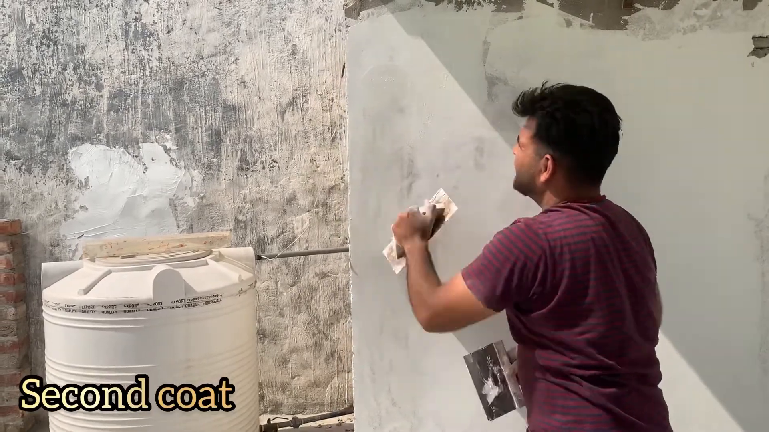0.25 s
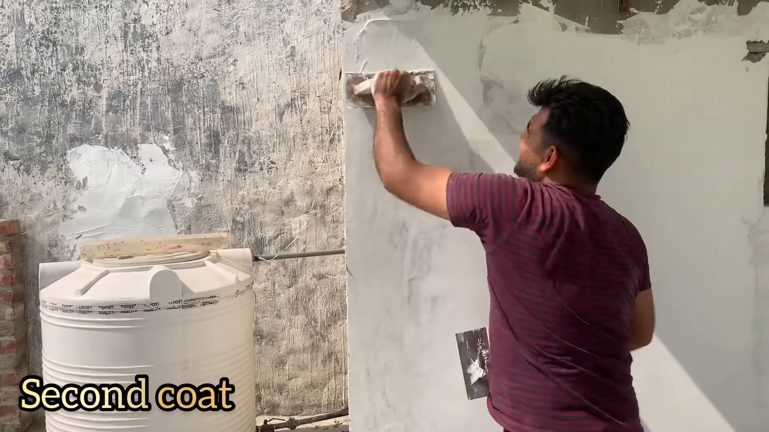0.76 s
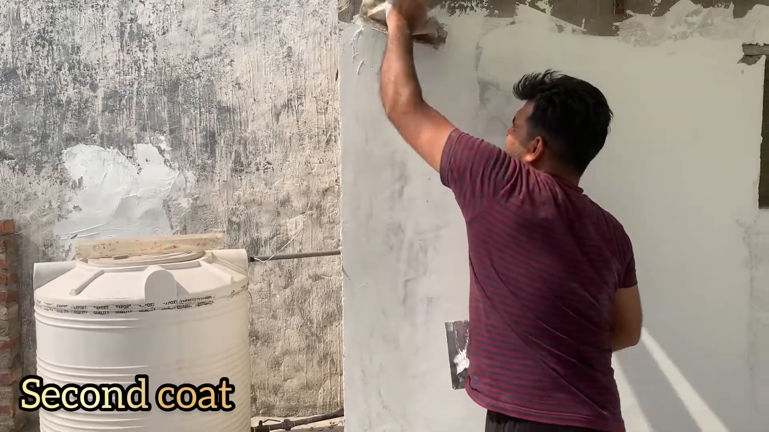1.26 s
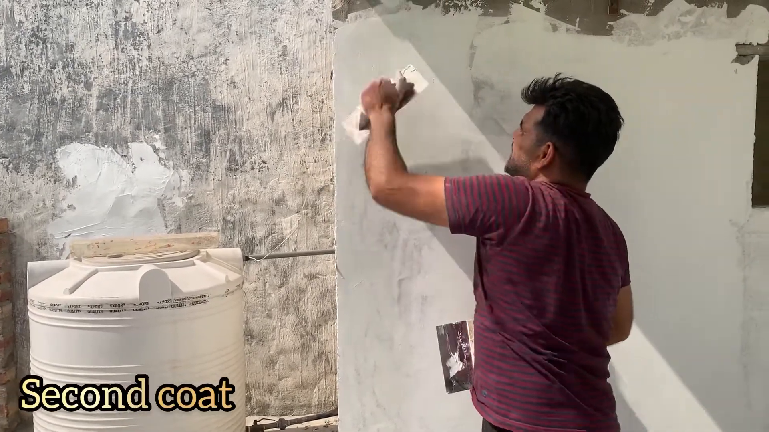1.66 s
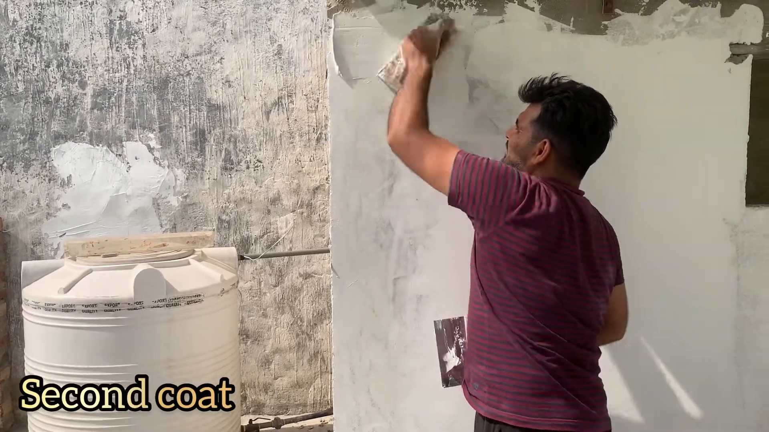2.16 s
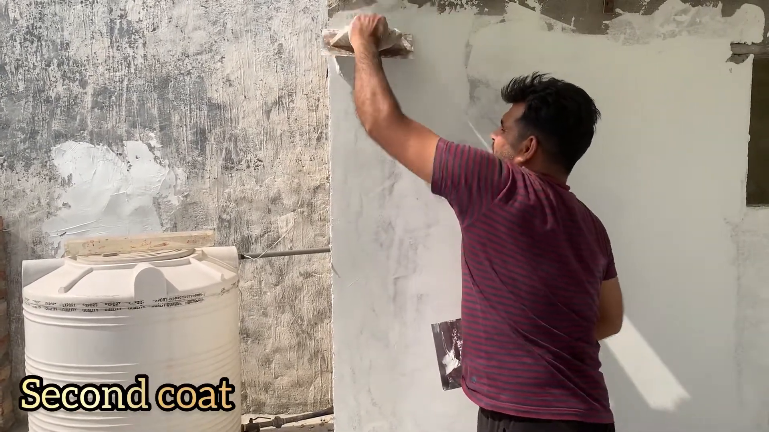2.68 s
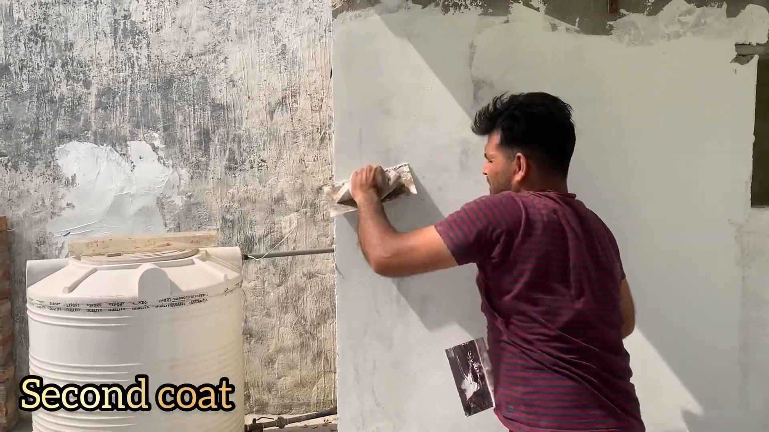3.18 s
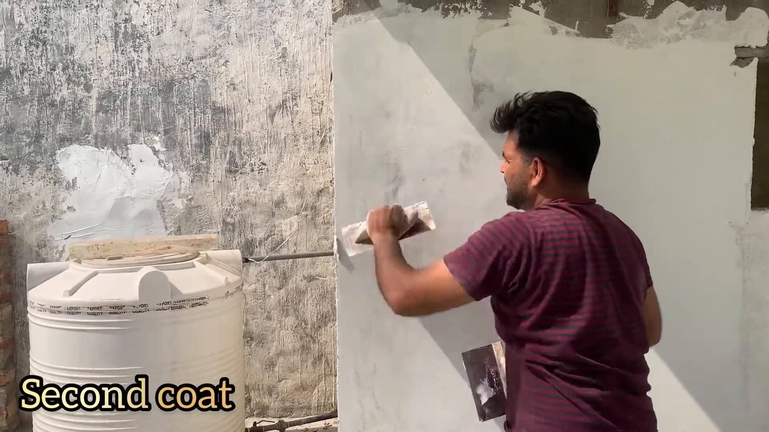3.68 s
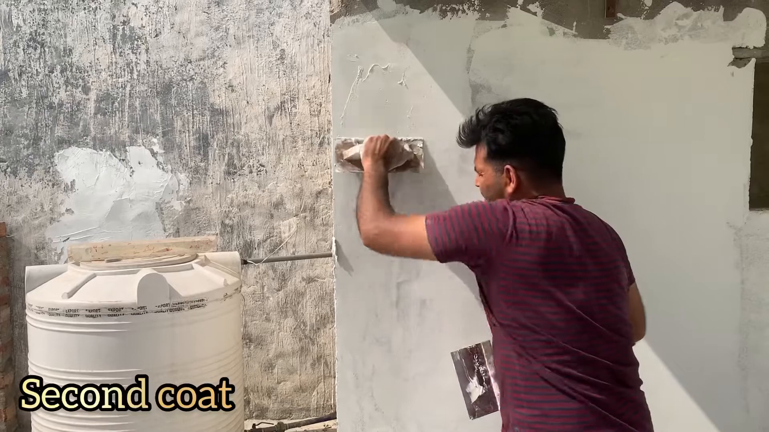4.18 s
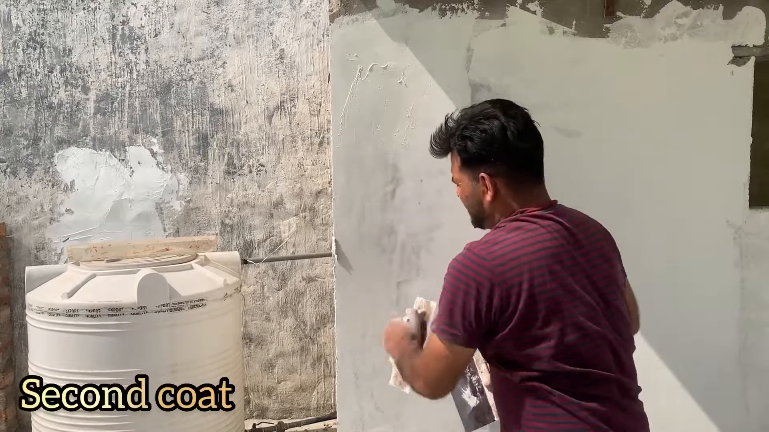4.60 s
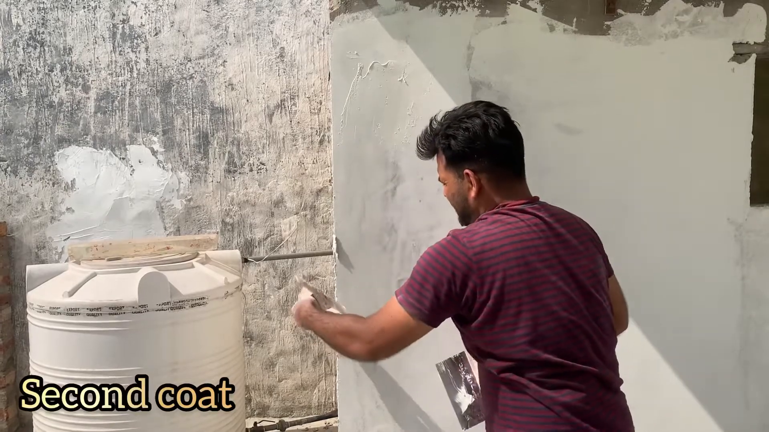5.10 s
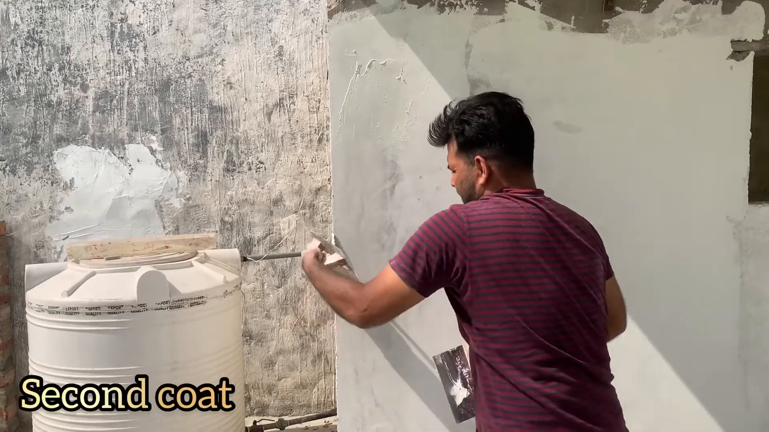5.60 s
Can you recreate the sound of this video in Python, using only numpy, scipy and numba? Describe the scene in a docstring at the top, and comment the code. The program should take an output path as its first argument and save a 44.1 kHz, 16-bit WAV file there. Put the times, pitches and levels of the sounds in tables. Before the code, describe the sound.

A steel trowel spreads plaster on an outdoor wall, about two metres from the microphone. Each stroke is a gritty, uneven scrape with sandy hiss and a slight metallic ring, duller when the blade lies flat and brighter on edge. Short, crunchy knocks mark it landing or turning.

A brief scrape opens, and another follows a knock at 0.6 seconds. The loudest strokes come at 1.1 to 1.5, around 2.1, and 2.4 to 2.6 seconds. A lighter, longer sweep runs until 3.5, ending with a knock. Another goes from 4 to 4.5 seconds, closing on a sharp knock. Faint scrapes and ticks follow near 4.7 and from 5.3 to 5.6.

Underneath, a nearby machine gives a low, wavering hum, strongest around 2.3 seconds and weaker after 3, blending into the continuous distant rumble of a town.

```python
"""A steel trowel spreads plaster on an outdoor wall, two metres from a phone with two microphone ports.
Sand grains catch under the edge, hiss and ring the blade: lower when it lies flat, brighter on edge.
The blade knocks where it lands, turns or hits a lump.
A machine drones nearby over the low rumble of the town."""
import sys
import numpy as np
from scipy import signal
from scipy.fft import rfft, irfft, next_fast_len
from scipy.io import wavfile
from scipy.ndimage import uniform_filter1d
from numba import njit

SR = 44100
rng = np.random.default_rng(int(sys.argv[2]) if len(sys.argv) > 2 else 0)


def to_wav(sig):
    """Store sig (one row per channel, or 1-D mono) as 16-bit WAV at the path in sys.argv[1].

    Samples outside -1..1 are clipped; the rate is SR.
    """
    pcm = np.clip(np.atleast_2d(sig), -1, 1) * 32767
    pcm = np.round(pcm).astype(np.int16)
    wavfile.write(sys.argv[1], SR, pcm.T)  # frames by channels


N = 257984
FFT_SIZE = next_fast_len(N + 4096)  # room for filter tails
BINS_HZ = np.arange(FFT_SIZE // 2 + 1) * SR / FFT_SIZE


def undb(db):
    return 10 ** (np.asarray(db) / 20)


def level(x, rms_db):
    return x * undb(rms_db) / np.sqrt(np.mean(x ** 2))


def over_time(table):
    """A (time_s, value) curve read at every sample."""
    time_s, value = np.transpose(table)
    return np.interp(np.arange(N) / SR, time_s, value)


def over_bins(table, log=True):
    """A (freq_hz, value) curve read at every bin of the spectrum."""
    hz, value = np.transpose(table)
    return np.interp(np.log(BINS_HZ + 1), np.log(hz), value) if log else np.interp(BINS_HZ, hz, value)


def filtered(x, response):
    return irfft(rfft(x, FFT_SIZE) * response, FFT_SIZE)[..., :N]


def equalise(x, curve):
    return filtered(x, undb(over_bins(curve)))


def wander(rate_hz):
    """Smooth random modulation with a spread near 1."""
    hold = int(SR / rate_hz)
    steps = np.repeat(rng.standard_normal(N // hold + 1), hold)
    return 1.49 * uniform_filter1d(uniform_filter1d(steps, hold), hold)[:N]


@njit
def resonator(x, centre_hz, width_hz):
    """State-variable band-pass with a moving centre and width, unity gain at the centre."""
    y, band_state, low_state = np.empty(len(x)), 0., 0.
    for i in range(len(x)):
        g, loss = np.tan(np.pi * centre_hz[i] / SR), width_hz[i] / centre_hz[i]
        band = (band_state + g * (x[i] - low_state)) / (1 + g * (g + loss))
        band_state, low_state = 2 * band - band_state, low_state + 2 * g * band
        y[i] = loss * band
    return y


def ports(common, own, likeness, left_lead_rad):
    """Stereo image: a common sound, phase-shifted on the right, plus a part each port hears alone."""
    share = np.clip(over_bins(likeness), 0, 1)
    shift = np.array([np.ones_like(left_lead_rad), np.exp(-1j * left_lead_rad)])
    return filtered(common, np.sqrt(share) * shift) + filtered(own, np.sqrt(1 - share))


def hand():
    """Pressure, blade flatness and the pitch the contact point favours, as strokes land and lift off."""
    # one gesture per stroke: time_s, pressure_db, flatness_db, favoured_hz
    strokes = [
        [(0.0, -27, -8, 3060), (0.025, -23, -0.5, 1210), (0.06, -24.5, -3, 3900), (0.1, -30.5, -5, 2500),
         (0.13, -47, 3.5, 3030), (0.17, -49, -3, 3000)],
        [(0.59, -41.5, 6.5, 1290), (0.66, -37, 5, 3420), (0.7, -25, -3, 2900), (0.73, -22, -8, 1500),
         (0.76, -23, -13, 3020), (0.8, -26.5, -2, 1090), (0.85, -29, 6.5, 1430)],
        [(1.114, -33, 9, 1500), (1.14, -18, 10, 940), (1.165, -22, 7.5, 750), (1.2, -15, 8, 1610),
         (1.24, -10, 5, 800), (1.275, -9.5, 4, 1400), (1.3, -8, 1.5, 1600), (1.34, -23.5, 0.5, 990),
         (1.42, -27, -9, 1340), (1.54, -31.5, 2, 1000)],
        [(1.96, -46.5, -5, 2200), (2.005, -40, -7.5, 2000), (2.03, -14.5, -9, 1970), (2.08, -9.5, -19, 2000),
         (2.11, -14.5, -19, 1900), (2.13, -8, -7, 1250), (2.165, -17, -2.5, 1460), (2.2, -36, 2, 1100),
         (2.26, -46.5, 9, 1500)],
        [(2.41, -27.5, 7.5, 1850), (2.435, -18, 7, 1500), (2.48, -35.5, 11, 900), (2.55, -15.5, 7.5, 1800),
         (2.6, -10, 6, 1610), (2.66, -30, 7, 1000)],
        [(2.67, -39.5, 9, 950), (2.85, -35, -2.5, 3000), (2.95, -36, -5, 1490), (3.01, -32, -2, 3570),
         (3.13, -36, -8, 1500), (3.18, -30, -3, 1950), (3.27, -26, -12.5, 3000), (3.42, -33, -2, 2000),
         (3.48, -29, -3, 1510), (3.52, -32, 0, 1500)],
        [(4.0, -31.5, 6.5, 960), (4.08, -33, -4.5, 1010), (4.14, -27, -4.5, 1500), (4.22, -21.5, -8, 2950),
         (4.33, -25.5, -8.5, 3950), (4.41, -23, -11, 2760), (4.47, -21.5, 3.5, 1170), (4.51, -30, -4, 1950)],
        [(4.56, -55, 12, 1500), (4.68, -46, 2, 2800), (4.72, -49, 5, 2000), (4.75, -30, 3, 4170),
         (4.79, -39, 6.5, 1900)],
        [(5.32, -46.5, 0, 980), (5.36, -40.5, 6.5, 980), (5.39, -39, 4, 980), (5.43, -35, 5, 980),
         (5.45, -39.5, 7.5, 980)],
        [(5.495, -33.5, 2, 990), (5.525, -33, 8.5, 1000), (5.56, -43.5, 5, 980), (5.6, -39.5, 7.5, 977)],
    ]
    land_s, lift_db_per_s = 0.016, 702
    t, press_db = np.arange(N) / SR, np.full(N, -120.)
    for stroke in strokes:
        time_s, stroke_db, *_ = np.transpose(stroke)
        landing_db = 60 * np.clip((time_s[0] - t) / land_s, 0, None)
        lifting_db = lift_db_per_s * np.clip(t - time_s[-1], 0, None)
        press_db = np.maximum(press_db, np.interp(t, time_s, stroke_db) - landing_db - lifting_db)
    rows = np.concatenate(strokes)
    return press_db, over_time(rows[:, [0, 2]]), over_time(rows[:, [0, 3]])


def sand(spread_db):
    """Dense grains of uneven size, none bigger than the sieve let through."""
    noise = rng.standard_normal(N)
    size_db = spread_db * np.minimum(rng.exponential(size=N), 3)
    return level(noise * undb(size_db), 0)


def blade_modes(flat_db, favoured_hz):
    """Lying flat sounds the belly, on edge the high modes; bending makes them drift and trade level."""
    # steel resonances: pitch_hz, width_hz, level_db, db_per_flatness_db
    resonances = [(604, 68, -15.5, 1.5), (752, 45, -3.5, 1.2), (961, 65, -7, 1.19), (1055, 45, -2.5, 0.35),
                  (1308, 46, -5.5, 0.5), (1426, 60, -2.5, 0.15), (1619, 50, -6.5, 1.0),
                  (1830, 55, -4.5, 0.76), (1970, 61, -5.5, -0.1), (2260, 50, -9.5, 0.5),
                  (2546, 64, -12.5, 0.62), (2923, 61, -3, -0.16), (3460, 77, -12, 0.05),
                  (3820, 100, -5, 0.2), (3995, 75, -5, -0.35)]
    contact_db, contact_octaves = 5.5, 0.3
    modes = []
    for hz, width_hz, db, per_flat in resonances:
        favour_db = contact_db * np.exp(-(np.log2(hz / favoured_hz) / contact_octaves) ** 2)
        bend_pct = 0.78 * wander(11) - 0.05 * flat_db  # on edge the blade bends and goes sharp
        rubbed = undb(per_flat * flat_db + 2.84 * wander(40) + favour_db)
        modes.append((hz * (1 + bend_pct / 100), width_hz, db, rubbed, undb(favour_db)))
    return modes


def blade(scrape, blows, flat_db, damping, modes):
    """Scrape and knocks sound straight off the wall, more so with the blade flat, and ring the steel."""
    # tone of the scrape and of a knock off the wall: freq_hz, gain_db
    grit_eq = [(480, -36.5), (750, -12), (1500, -6), (4000, -9.5), (11000, -25.5)]
    thud_eq = [(250, -18.5), (700, -4), (1500, -3), (3500, -4), (9000, -23)]
    grit = undb(-3) * equalise(scrape * undb(0.14 * flat_db), grit_eq)
    thud = undb(-6) * equalise(blows * undb(0.25 * flat_db), thud_eq)
    out = grit + thud
    for k, (centre_hz, width_hz, db, rubbed, struck) in enumerate(modes):
        drive = scrape * rubbed / np.sqrt(damping) + blows * struck
        out += (-1) ** k * undb(db) * resonator(drive, centre_hz, width_hz * damping)
    return out


def trowel():
    """Scrape, hiss and knocks, heard once directly and once, unlike at each port, off the yard."""
    # fine hiss of the sand: freq_hz, gain_db
    hiss_eq = [(3000, -31.5), (4500, -3), (6200, 0.5), (7600, -3), (8500, 6.5), (10500, -1.5),
               (13300, -1.5), (15000, -17)]
    # sound common to both ports: freq_hz, share (0-1)
    likeness = [(1500, 0.86), (3500, 0.63), (8000, 0.54), (10500, 1)]
    # the right port hears the wall: freq_hz, left_lead_rad
    port_phase = [(0, 0), (2000, -.4), (4200, 1.3), (5000, 3.1), (6200, 6.3), (7200, 9.4), (8000, 10.4),
                  (8700, 9.4), (10100, 6.3), (13500, 0), (14800, -3.1)]
    skips_under_db, damped_over_db = -28.5, -25
    press_db, flat_db, favoured_hz = hand()
    modes = blade_modes(flat_db, favoured_hz)
    # the hiss grows less than the pressure and is stronger on edge
    hiss_db = -30.5 + 0.85 * press_db - 0.45 * flat_db
    # the edge sticks and slips; a light touch skips more than a firm one
    skip = 1 + np.clip(skips_under_db - press_db, 0, 20) / 30
    stick_slip = undb(skip * (1.21 * wander(30) + 1.4 * wander(160)))
    # pressed into the plaster, the modes widen
    damping = undb(0.26 * np.clip(press_db - damped_over_db, 0, None))
    paths = []
    for _ in range(3):  # common, left, right
        grains = sand(spread_db=4.2) * stick_slip
        ring = blade(undb(press_db) * grains, knocks(), flat_db, damping, modes)
        hiss = undb(hiss_db) * level(equalise(grains, hiss_eq), 0)
        paths.append(ring + hiss)
    return ports(paths[0], np.array(paths[1:]), likeness, over_bins(port_phase, log=False))


def knocks():
    """Each knock is a short crunch with a sharp attack, brighter and shorter the harder the contact."""
    # the blade lands, turns or hits a lump: start_s, force_db, hardness_hz, relative_tick_db
    hits = [(.0145, -14, 1600, 4.5), (.165, -26.5, 9000, -4), (0.577, -13, 1920, -5.5),
            (1.108, -23.5, 4800, -5), (1.132, -10.5, 1880, -6), (1.985, -30, 9000, 0.5),
            (2.010, -26, 2200, -12), (2.027, -16.5, 2240, -12), (2.125, -11, 1905, -10),
            (2.404, -17.5, 2500, -1.5), (2.424, -12.5, 2560, -3), (3.309, -19.5, 4500, -12),
            (3.448, -11, 2300, -14), (3.935, -25, 2400, -8), (3.995, -18, 1800, -6),
            (4.117, -24, 2250, -12), (4.439, -8.5, 1540, -1), (4.736, -23, 7050, -7), (5.422, -34, 3000, 0),
            (5.487, -27.5, 2500, 1.5), (5.805, -34.5, 6540, -11.5)]
    attack_cycles, decay_cycles, tick_ms = 2.5, 15.3, 3
    out, ms = np.zeros(N), np.arange(SR // 10) * 1000 / SR
    for start_s, force_db, hard_hz, tick_db in hits:
        noise = rng.standard_normal(len(ms))
        cycles = ms * hard_hz / 1000
        envelope = np.minimum(cycles / attack_cycles, 1) * np.exp(-cycles / decay_cycles)
        band = signal.butter(3, [hard_hz / 6, hard_hz], "band", fs=SR, output="sos")
        crunch = signal.sosfilt(band, noise * envelope)
        tick = undb(tick_db) * noise * np.exp(-ms / tick_ms)  # the first touch of steel
        knock = undb(force_db) * (crunch / np.abs(crunch).max() + tick)
        i = int(start_s * SR)
        out[i:i + len(ms)] += knock[:N - i]
    return out


def drone(glide, fader):
    """A low sine that follows a pitch and a level curve and reaches the left port a little earlier."""
    turns = rng.random() + np.cumsum(over_time(glide)) / SR + np.array([[.03], [0]])
    return np.sqrt(2) * undb(over_time(fader)) * np.sin(2 * np.pi * turns)


def machine():
    """Two near-steady tones swell and fade; the low hum wavers as it mingles with the town's rumble."""
    # level rides of the two tones: time_s, level_db
    lower_fader = [(.1, -24), (.6, -31), (1.2, -27.5), (2.3, -25.5), (3.0, -33), (5.6, -34.5)]
    upper_fader = [(1.3, -38), (2.3, -34), (2.45, -50), (2.8, -39), (3.4, -46)]
    # wavering of the low hum as heard amid the rumble: centre_s, gain_db
    wavers = [(.77, -5.5), (2.96, -5.5), (3.7, -11.5), (4.07, -9), (4.5, -14), (5.45, -10.5)]
    # time_s, pitch_hz
    lower_glide, upper_glide = [(3.6, 53.23), (4.1, 51.75)], [(0.501, 64.76), (2.197, 67.77)]
    t, waver_s = np.arange(N) / SR, 0.13
    waver_db = sum(db * np.exp(-((t - centre_s) / waver_s) ** 2) for centre_s, db in wavers)
    return drone(lower_glide, lower_fader) * undb(waver_db) + drone(upper_glide, upper_fader)


def town():
    """Far rumble, mostly from the right; narrow bands of its bass come and go like passing engines."""
    # tone of the rumble: freq_hz, gain_db
    rumble_eq = [(28, -28), (45, 0.5), (75, -8.5), (110, -4.5), (200, -16), (300, -21.5), (500, -25),
                 (800, -30.5), (1500, -33.5), (3000, -42.5), (4500, -50.5), (6500, -60.5), (8500, -68.5),
                 (11000, -65.5), (13500, -70.5), (15000, -84.5)]
    # rumble common to both ports: freq_hz, share (0-1)
    likeness = [(60, 0.9), (200, 0.69), (1200, 0.35), (3000, 0.47)]
    # slow swell of the whole bed: time_s, gain_db
    fader = [(2.9, 2), (3.2, 3.5), (4.4, 1.5), (5.85, -0.5)]
    left_lag_s = 0.00032
    noise = rng.standard_normal((3, N))  # common, left, right
    for hz in 80 * 1.3 ** np.arange(8):
        centre_hz = hz * (1 + wander(1) / 12)
        swell = undb(2.5 + 2.5 * wander(3))
        for path in noise:
            path += swell * resonator(rng.standard_normal(N), centre_hz, centre_hz / 14)
    stereo = ports(noise[0], noise[1:], likeness, -2 * np.pi * left_lag_s * BINS_HZ)
    return level(equalise(stereo, rumble_eq), -40) * undb(over_time(fader))


def scene():
    """Trowel and machine, both panned a touch right, over the town."""
    return trowel() * undb([[-.4], [.4]]) + machine() * undb([[-.5], [.5]]) + town()


def record(dry):
    """A 4 ms fade-in avoids a click; the highest treble is cut."""
    fade_s, top_hz = .004, 15750
    fade = np.minimum(np.arange(N) / SR / fade_s, 1)
    return signal.sosfilt(signal.ellip(12, .2, 90, top_hz, fs=SR, output="sos"), dry * fade)


dry = scene()
out = record(dry)
to_wav(out)
```